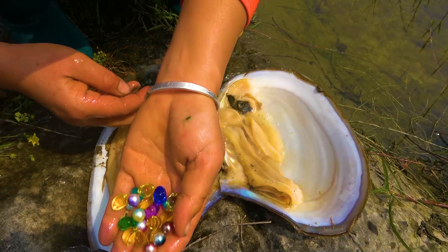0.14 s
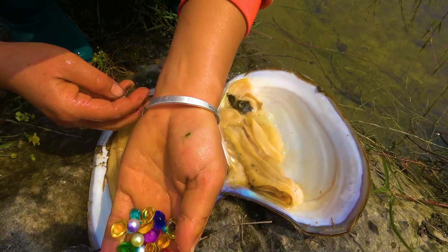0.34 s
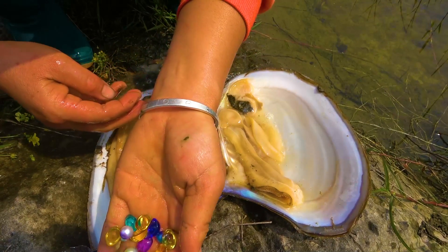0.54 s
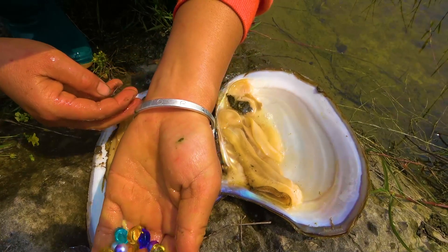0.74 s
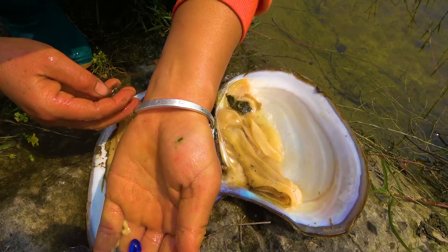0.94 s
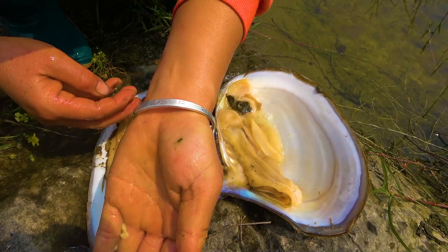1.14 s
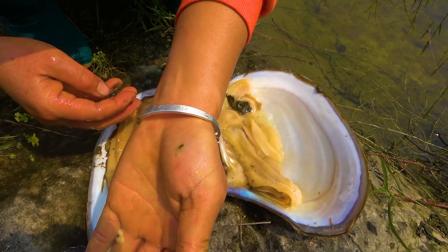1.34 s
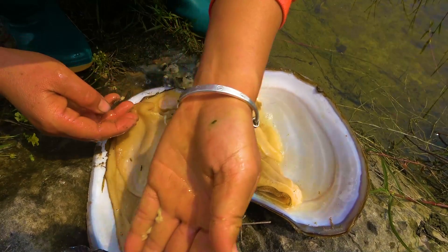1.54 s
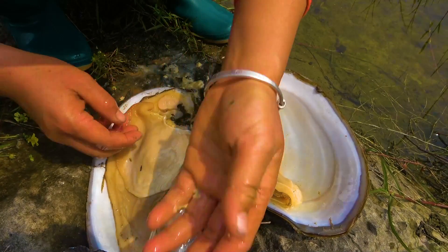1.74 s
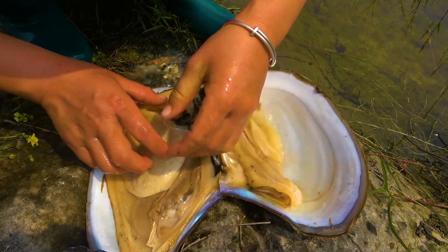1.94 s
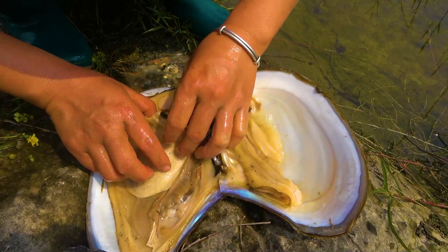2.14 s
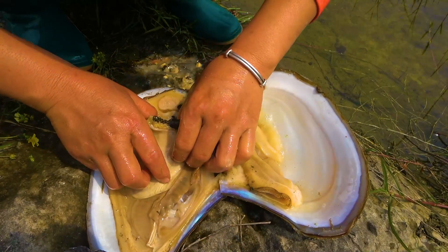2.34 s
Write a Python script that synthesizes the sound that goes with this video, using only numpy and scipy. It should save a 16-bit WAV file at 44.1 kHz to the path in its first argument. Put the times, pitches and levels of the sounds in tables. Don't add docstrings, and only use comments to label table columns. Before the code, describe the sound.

Small hard beads click in a wet palm, then pour in a dense, bright, ringing clatter into a thin bowl and thin out to single drops; soft wet rubbing follows, quiet outdoors, very close microphone.

```python
import sys
import numpy as np
from scipy import signal
from scipy.fft import rfft, irfft
from scipy.io import wavfile
from scipy.ndimage import uniform_filter1d

SR = 44100
rng = np.random.default_rng(int(sys.argv[2]) if len(sys.argv) > 2 else 0)


def materialize(psi):
    bounded = np.clip(np.atleast_2d(psi).T, -1, 1)
    quanta = np.round(bounded * 32767).astype(np.int16)
    wavfile.write(sys.argv[1], SR, quanta)


def gain_from_db(level_db):
    decades = np.asarray(level_db, float) / 20
    return 10 ** decades


N = 110161

# (frequency [Hz], level [dB per Hz])
DRONE_COLOUR = [(150, -12.5), (450, -20.5), (660, -10), (830, -14.5), (1000, -5), (1180, -25.5),
                (1350, -12.5), (1800, -47.5)]
# (time [s], level [dB])
WIND_LEVEL = [(0, -67), (.17, -51), (.23, -53), (.27, -43.5), (.31, -58), (.63, -62), (.67, -54.5),
              (.75, -61.5), (1.28, -55.5), (2.5, -69.5)]
# (time [s], level [dB])
RUB_LEVEL = [(0, -61.5), (.4, -73.5), (.7, -70), (1.86, -61), (1.99, -54), (2.11, -53.5), (2.17, -61),
             (2.42, -52.5), (2.46, -47.5), (2.5, -46.5)]
# (frequency [Hz], level [dB per Hz])
RUB_COLOUR = [(300, 0), (700, -4), (2500, -1), (6700, -7.5), (16000, -18.5)]
# (time [s], level [dB], pitch [Hz], time to fall 60 dB [s])
SHELL_TAPS = [
    (.597, -45, 890, 0.082),
    (1.891, -45.5, 9200, 0.0096),
    (2.199, -39.5, 1820, 0.023),
    (2.254, -45.5, 352, 0.031),
    (2.253, -46, 1550, 0.025),
    (2.254, -47.5, 4500, .02),
    (2.281, -44, 5770, .01),
    (2.281, -46.5, 1780, 0.045),
    (2.404, -38.5, 7950, 0.0094),
]
# (time [s], level [dB], centre frequency [Hz])
PALM_CLICKS = [(0.0041, -27, 8800), (0.0123, -31.5, 8300), (0.015, -62, 8100.0), (0.0188, -41, 6450),
               (0.2383, -38.5, 5700), (0.2803, -41.5, 7900), (0.3197, -41.5, 6450), (0.3421, -37, 5700),
               (0.55, -51, 10000), (0.602, -44, 8460), (0.686, -46, 9500), (0.713, -53, 8000),
               (0.769, -41, 6500), (0.7878, -44, 9000), (0.66, -36, 7200), (0.665, -35.5, 7940),
               (0.672, -44.5, 8460), (0.6752, -39, 9100), (0.6816, -35.5, 8600), (0.7237, -33, 9200),
               (0.742, -43, 6500.0), (0.7476, -40.0, 5700.0), (0.7567, -35.5, 9200), (0.7758, -33, 8100.0),
               (0.782, -37, 10400)]
# (time [s], level [dB])
POUR_KNOCKS = [(0.7978, -32), (0.8039, -28), (0.8068, -31), (0.8233, -24), (0.8315, -30), (0.846, -33),
               (0.8764, -31), (0.8823, -19), (0.9104, -15), (0.9158, -20), (0.9255, -16.5), (0.9585, -13),
               (0.9692, -25), (0.9769, -22.5), (0.9887, -17.5), (1.0203, -27), (1.0238, -22), (1.036, -34),
               (1.0452, -35), (1.0663, -24), (1.0905, -18), (1.1002, -18), (1.1108, -24), (1.1139, -23),
               (1.1372, -33), (1.1394, -15.5), (1.1471, -18.5), (1.188, -27), (1.1916, -24), (1.2002, -18),
               (1.2249, -24), (1.227, -27), (1.2434, -18.5), (1.2498, -18.5), (1.2929, -15.5), (1.323, -22),
               (1.3257, -24), (1.3303, -15.5), (1.343, -17.5), (1.3631, -17.5), (1.374, -29)]
# (time [s], level [dB], centre frequency [Hz], bowl boom [dB])
POUR_FIRST_HALF = [(0.8129, -6.5, 5700, -23), (0.8253, -16.5, 5740, -24), (0.8337, -14.5, 8000, -11),
                   (0.8368, -9, 5100, -14.5), (0.854, -6, 4970, -16), (0.8642, -10.5, 4800, -25),
                   (0.8688, -14, 5300, -15), (0.8857, -12.5, 5560, -11), (0.8886, -14.5, 6500, -14),
                   (0.8951, -9, 6500, -19), (0.9007, -8.5, 5500, -14), (0.9188, -9.5, 7700, -11),
                   (0.9348, -11, 5900, -12), (0.943, -11, 6100, -8.5), (0.954, -10.5, 6600, -23),
                   (0.9836, -7, 5060, -11.5), (0.9986, -9, 6560, -16.5), (1.0096, -10, 7840, -17),
                   (1.0275, -9.5, 5730, -13.5), (1.0314, -11.5, 6500, -15.5), (1.0545, -6, 6100, -14.5),
                   (1.0605, -9, 5940, -13.5), (1.0716, -6.5, 7500, -10.5), (1.077, -11, 5400, -16),
                   (1.0815, -9, 5260, -13)]
# (time [s], level [dB], centre frequency [Hz], bowl boom [dB])
POUR_SECOND_HALF = [(1.095, -9, 6300, -11), (1.1062, -11, 4900, -12), (1.1213, -6.5, 5300, -14.5),
                    (1.1423, -14, 6600, -13), (1.15, -10.5, 6000, -10), (1.1611, -5.5, 5240, -12),
                    (1.182, -12, 6960, -13), (1.1942, -9.5, 7700, -17), (1.2018, -13.5, 7500, -12),
                    (1.2055, -7.5, 5100, -14.5), (1.2099, -7.5, 4840, -23), (1.218, -15.5, 8400, -6.5),
                    (1.2371, -8.5, 7700, -17), (1.2525, -14.5, 4600, -14), (1.2551, -9.5, 6050, -17),
                    (1.2622, -12.5, 4360, -17), (1.2699, -16, 6800, -13.5), (1.2753, -11, 6200, -16),
                    (1.2785, -11.5, 4800, -13.5), (1.2829, -11, 7040, -35), (1.288, -13.5, 5650, -21),
                    (1.3064, -15, 5450, -12), (1.3175, -10.5, 4970, -13), (1.3322, -16.5, 4640, -7),
                    (1.3482, -10, 3870, -8.5)]
# (time [s], level [dB], centre frequency [Hz], bowl boom [dB])
LAST_BEADS = [(1.414, -13.5, 6160, -10.5), (1.4177, -8, 4900, -20), (1.4272, -36, 4800, -6),
              (1.4321, -26.5, 8100, -4), (1.4422, -29, 5300, -14), (1.4456, -24, 6200, -12),
              (1.4578, -39, 7800, -6), (1.4673, -31, 5700, -7), (1.4944, -20, 5840, -18),
              (1.5083, -42, 3500, -3), (1.5112, -33, 4000, -4), (1.5243, -34, 4100, -11),
              (1.5336, -19, 6200, -18), (1.5632, -29, 5700, -8), (1.5682, -8.5, 5360, -14),
              (1.579, -26.5, 5900, -20), (1.5823, -31.5, 4600, -5), (1.5949, -27.5, 5670, -13),
              (1.5976, -27, 6900, -21), (1.607, -35, 4500, -5), (1.6371, -29.5, 6500, -5),
              (1.6428, -9, 6850, -11), (1.6472, -11, 6660, -25), (1.6533, -21, 6800, -27),
              (1.6568, -14.5, 6960, -15), (1.6885, -17.5, 5670, -10), (1.6928, -17.5, 6400, -25),
              (1.697, -20, 6200, -22), (1.7131, -37, 6300, -7), (1.725, -11.5, 7000, -25),
              (1.7544, -18.5, 5600, -8.5), (1.7628, -18.5, 9800, -7.5), (1.7672, -24, 8500, -18),
              (1.7773, -32, 10500, -6), (1.7807, -33, 5470, -2), (1.8023, -11.5, 8700, -15.5),
              (1.8251, -20, 8000, -15.5)]
# (frequency [Hz], level [dB])
BRIGHT_TONES = [(2010, 8), (2910, 4), (3810, 5.5), (4580, -2.5), (5190, -3), (6320, 0), (8080, -1.5),
                (9220, -1), (10900, -3), (12700, -5), (14800, -7)]
# (frequency [Hz], level [dB])
LOW_TONES = [(760, -9.5), (900, -3.5), (1070, 2.5), (1260, -4.5)]
# (time [s], length [s], start pitch [Hz], end pitch [Hz], bend [over 1 glides late, under 1 early])
BIRD_NOTES = [
    (.184, .014, 5700, 5450, 1),
    (.244, .02, 5500, 6300, .6),
    (.337, .105, 4550, 6900, 2.4),
    (.543, .03, 6050, 5450, .8),
    (.573, .007, 5500, 6600, 1.5),
    (.597, .063, 7200, 3000, .8),
    (.661, .036, 4700, 6350, .5),
    (2.2, .035, 4800, 4700, 1),
]

RING_T60_S, BOOM_T60_S, SPRAY_T60_S = 0.021, 0.028, 0.019
CRACK_S, BOOM_RISE_S = 0.00055, 0.00059
RING_SCATTER_DB, RING_DETUNE = 6.5, 0.03
CRACK_DB, SPRAY_DB, TICK_DB = 4.5, 4.5, 14
WIDE_HZ, BOOM_WIDE = 147000, 0.14
COLOUR_OCT = 0.96


def walk(rate):
    hold = int(SR / rate)
    steps = np.repeat(rng.standard_normal(N // hold + 1), hold)
    return uniform_filter1d(steps, hold)[:N]


def coloured(table, width):
    f = np.fft.rfftfreq(N, 1 / SR) + 1
    hz, db = np.array(table).T
    gain = gain_from_db(np.interp(np.log(f), np.log(hz), db, left=-70, right=-70))
    mid, side = rng.standard_normal((2, N))
    noise = np.array([mid + width * side, mid - width * side])
    sound = irfft(rfft(noise) * gain, N)
    return sound / sound.std()


def curve(table):
    return gain_from_db(np.interp(np.arange(N) / SR, *np.array(table, float).T))


def add(out, at_s, sound):
    i = int(at_s * SR)
    out[:, i:i + sound.shape[1]] += sound[:, :N - i]


def fade(t, t60):
    return np.exp(-np.log(1000) * t / t60)


def riverbank():
    drone = coloured(DRONE_COLOUR, 0.27) * gain_from_db(-57.5) * gain_from_db(1.2 * walk(6))
    hiss = coloured([(1500, -6), (6500, 0), (17000, -17)], 0.29) * gain_from_db(-65 + walk(12.1))
    wind = coloured([(15, -9), (45, 0), (129, -6), (230, -24)], 0.11)
    gusts = curve(WIND_LEVEL) * gain_from_db(3.5 * walk(54))
    return drone + hiss + wind * gusts


def hands_on_shell():
    grains = gain_from_db(0.94 * walk(60) + 2.4 * walk(600))
    out = coloured(RUB_COLOUR, 0.14) * curve(RUB_LEVEL) * grains
    t = np.arange(2048) / SR
    for at_s, db, hz, t60 in SHELL_TAPS:
        detune, level_db = rng.standard_normal((2, 5, 1))
        tones = np.sin(2 * np.pi * hz * (1 + 0.12 * detune) * t) * gain_from_db(level_db)
        tap = tones.sum(0) * fade(t, t60) / 2
        add(out, at_s, gain_from_db(db) * np.array([tap, tap]))
    return out


def bowl_boom(t):
    hz, db = np.array(LOW_TONES).T[:, :, None]
    detune, level_db = rng.standard_normal((2, len(hz), 1))
    tones = np.sin(2 * np.pi * hz * (1 + 0.05 * detune) * t)
    tones = tones * gain_from_db(db + 3 * level_db) * fade(t, BOOM_T60_S * 1000 / hz)
    boom = tones.sum(0) * (1 - np.exp(-t / BOOM_RISE_S))
    return boom / np.abs(boom).max(), BOOM_WIDE * detune[0]


def bead(centre_hz, boom_db, octaves, short):
    t = np.arange(1024) / SR

    def near_db(f):
        return -6 * (np.log2(f / centre_hz) / octaves) ** 2

    hz, db = np.repeat(np.array(BRIGHT_TONES, float), 3, axis=0).T
    scatter, detune, longer, lean = rng.standard_normal((4, len(hz), 1))
    gain = gain_from_db(db + near_db(hz))[:, None] * gain_from_db(RING_SCATTER_DB * scatter)
    tone_hz = hz[:, None]
    t60 = short * RING_T60_S * gain_from_db(1.5 * longer) * (centre_hz / tone_hz) ** 0.2
    tones = np.sin(2 * np.pi * tone_hz * (1 + RING_DETUNE * detune) * t) * fade(t, t60) * gain
    ring_side = (tones * lean * np.sqrt(tone_hz / WIDE_HZ)).sum(0)
    ring = np.array([tones.sum(0), ring_side]) / np.sqrt((gain ** 2).sum() / 2)

    f = np.fft.rfftfreq(len(t), 1 / SR) + 1
    shape = gain_from_db(np.interp(f, hz, np.minimum(db, 2), left=-40, right=-24) + near_db(f))
    burst = gain_from_db(CRACK_DB) * np.exp(-t / CRACK_S) + gain_from_db(SPRAY_DB) * fade(t, short * SPRAY_T60_S)
    spread = np.array([np.ones(len(f)), np.sqrt(f / WIDE_HZ)])
    noise = irfft(rfft(rng.standard_normal((2, len(t)))) * shape * spread)
    mid, side = ring + noise * burst / np.sqrt(np.mean(shape ** 2))

    tick = np.roll(irfft(shape), 16)
    mid = np.roll(mid, 14) + gain_from_db(TICK_DB) * tick / tick.max()
    peak = np.sqrt(2 * uniform_filter1d(mid ** 2, size=22).max())

    boom, boom_lean = bowl_boom(t)
    mid = mid / peak + gain_from_db(boom_db) * boom
    side = side / peak + boom_lean * gain_from_db(boom_db) * boom
    return np.array([mid + side, mid - side])


def beads():
    out = np.zeros((2, N))
    for at_s, db, hz in PALM_CLICKS:
        add(out, at_s, gain_from_db(db) * bead(hz, boom_db=-43, octaves=0.6, short=0.7))
    knocks = [(at_s, db, 5400, -13) for at_s, db in POUR_KNOCKS]
    strikes = list(POUR_FIRST_HALF) + list(POUR_SECOND_HALF) + knocks + list(LAST_BEADS)
    for at_s, db, hz, boom_db in strikes:
        busy = at_s < LAST_BEADS[0][0]
        add(out, at_s, gain_from_db(db + 0.5) * bead(hz, boom_db, COLOUR_OCT, 1.2 if busy else 0.86))
        for late, weakness in rng.random((2, 2)):
            weak_db = -17 - 10 * weakness
            if not busy:
                weak_db -= 6
            rattle = gain_from_db(db + weak_db) * bead(hz, boom_db, COLOUR_OCT, 1)
            add(out, at_s + 0.007 * (0.25 + late), rattle)
    thin = signal.sosfilt(signal.butter(3, 633, "high", fs=SR, output="sos"), out)
    hum = signal.lfilter(*signal.iirpeak(230, 8, SR), out)
    return thin + gain_from_db(-24.5) * (out - thin) + gain_from_db(2.5) * hum


def bird():
    out = np.zeros(N)
    for at_s, length_s, from_hz, to_hz, bend in BIRD_NOTES:
        u = np.arange(int(length_s * SR)) / (length_s * SR)
        pitch = from_hz + (to_hz - from_hz) * u ** bend
        note = np.sin(2 * np.pi * np.cumsum(pitch) / SR) * np.sin(np.pi * u) ** 0.15
        softer = at_s > 1 or at_s < 0.3
        out[int(at_s * SR):][:len(u)] += np.sqrt(2) * gain_from_db(-60.5 - 5 * softer) * note
    trees = rng.standard_normal((2, 4096)) * fade(np.arange(4096) / SR, 0.15)
    trees = trees / np.sqrt((trees[0] ** 2).sum())
    echo = signal.fftconvolve(out[None], trees, axes=1)[:, :N]
    direct = out * gain_from_db(2.5 * walk(300))
    return direct * gain_from_db(np.array([[2.5], [-2.5]])) + gain_from_db(-4) * echo


def scene():
    near = riverbank() + hands_on_shell() + beads()
    return near * gain_from_db(np.array([[1], [-1]])) + bird()


def roll_off(x):
    return signal.sosfilt(signal.butter(12, 16980, fs=SR, output="sos"), x)


def record(dry):
    rounded = np.tanh(1.707 * dry) / 1.609
    top_cut = signal.ellip(8, 0.3, 60, 16000, fs=SR, output="sos")
    finished = signal.sosfilt(top_cut, rounded)
    return roll_off(finished)


dry = scene()
out = record(dry)
materialize(out)
```